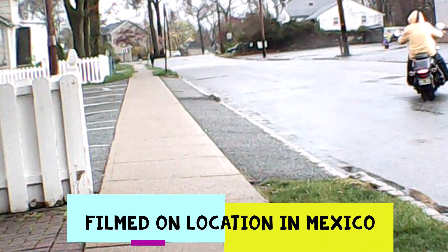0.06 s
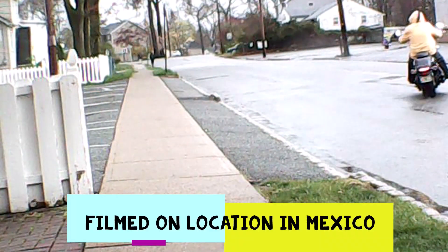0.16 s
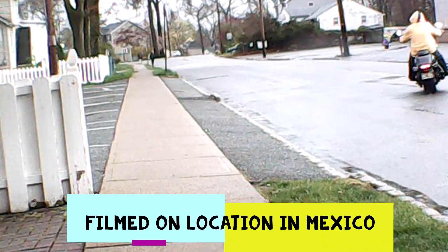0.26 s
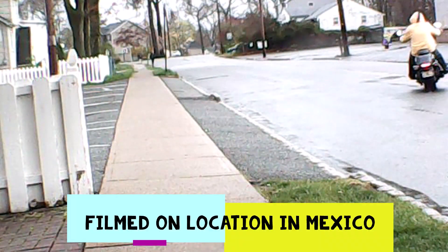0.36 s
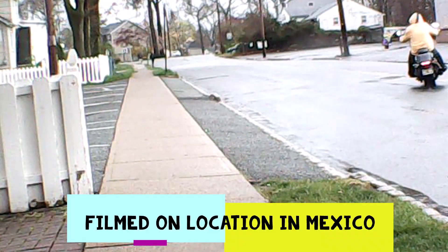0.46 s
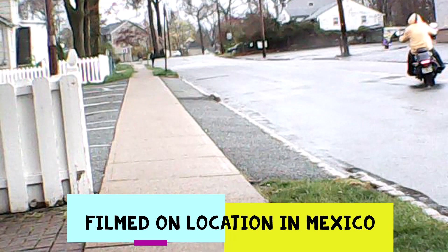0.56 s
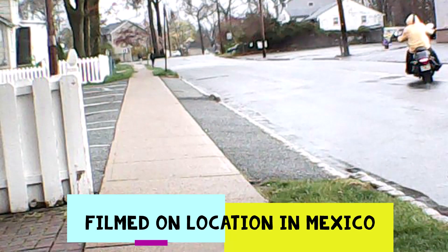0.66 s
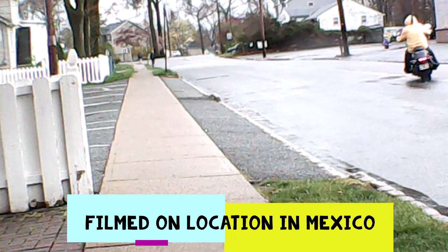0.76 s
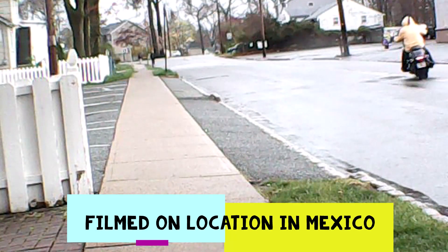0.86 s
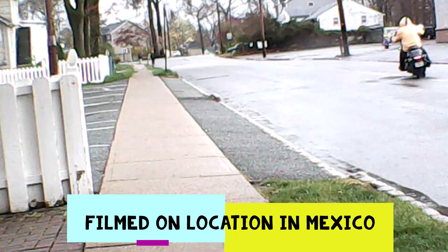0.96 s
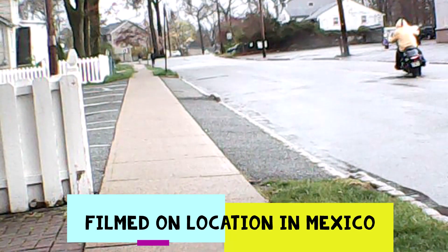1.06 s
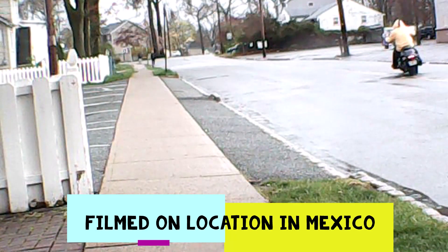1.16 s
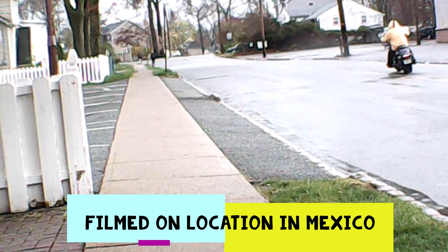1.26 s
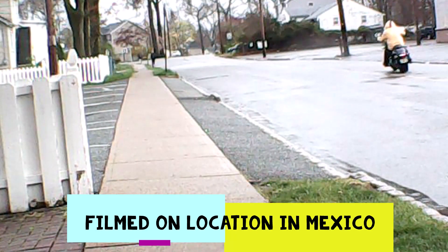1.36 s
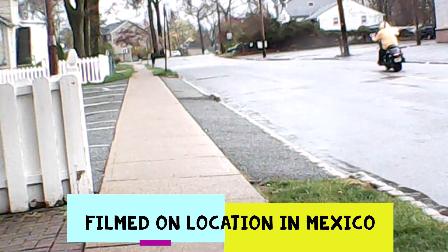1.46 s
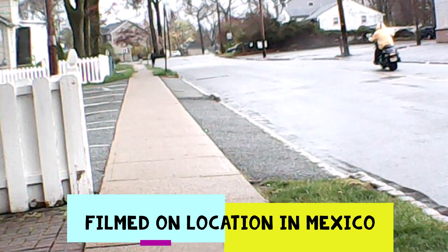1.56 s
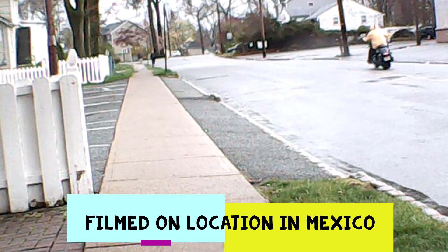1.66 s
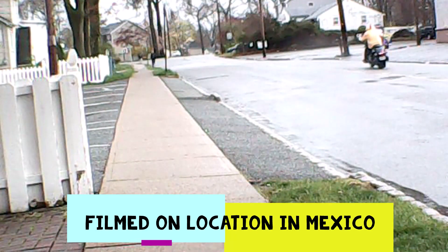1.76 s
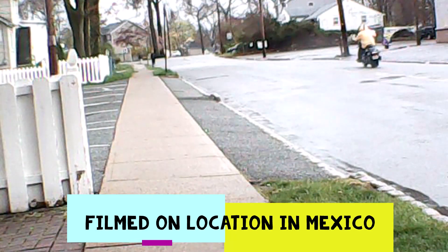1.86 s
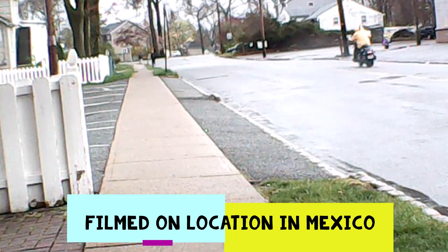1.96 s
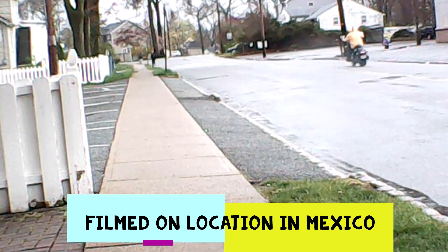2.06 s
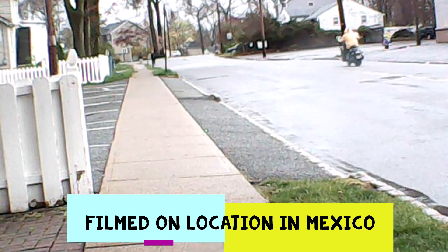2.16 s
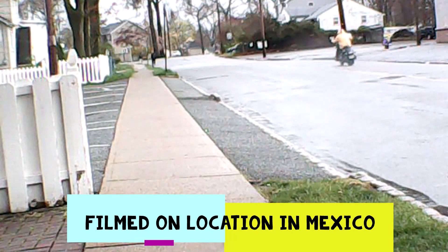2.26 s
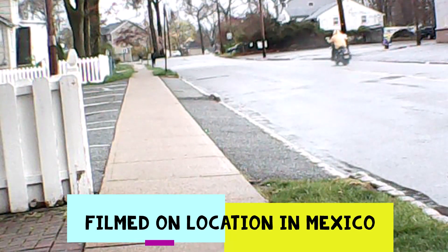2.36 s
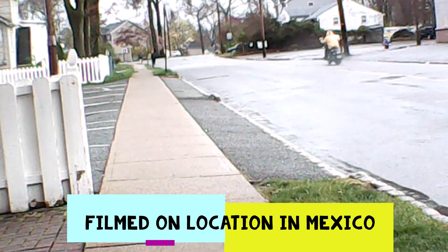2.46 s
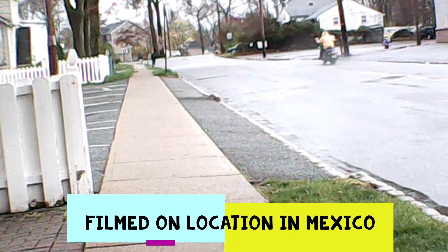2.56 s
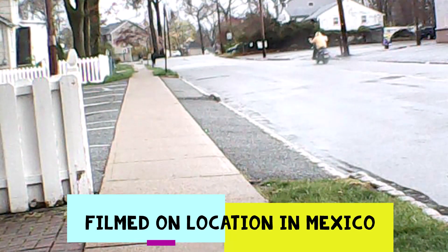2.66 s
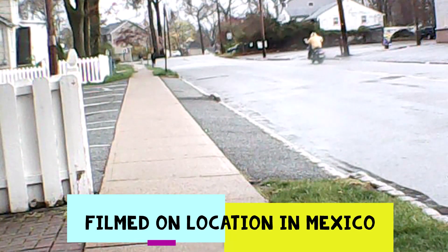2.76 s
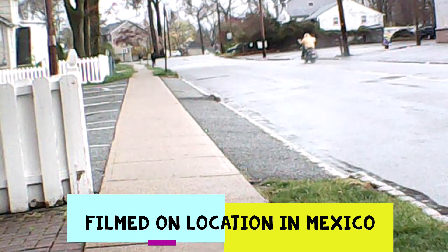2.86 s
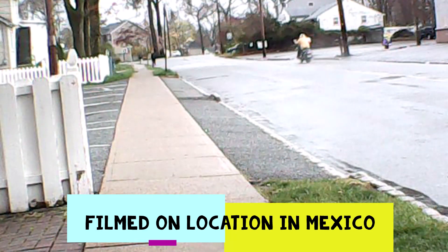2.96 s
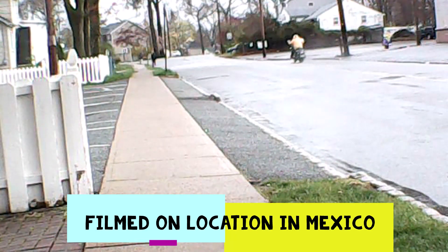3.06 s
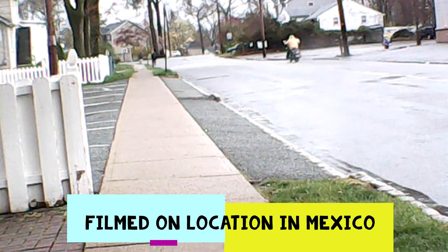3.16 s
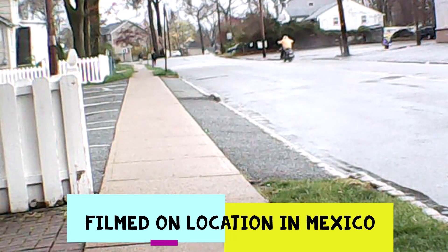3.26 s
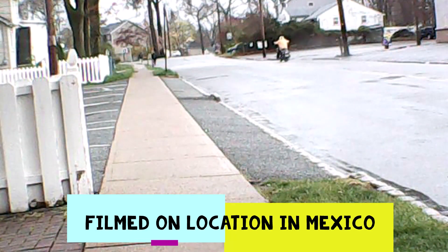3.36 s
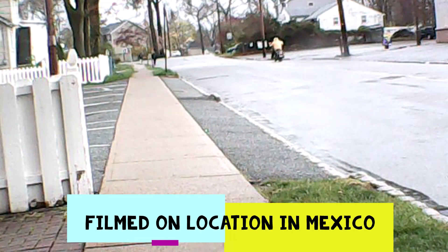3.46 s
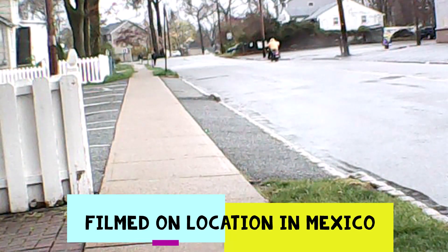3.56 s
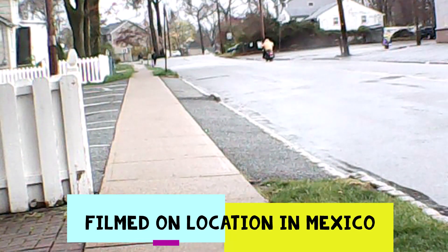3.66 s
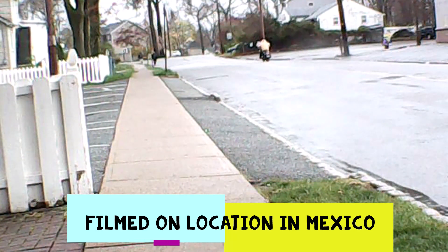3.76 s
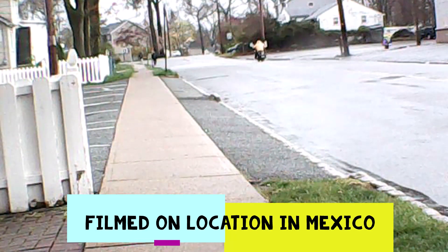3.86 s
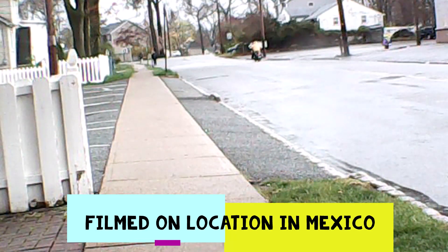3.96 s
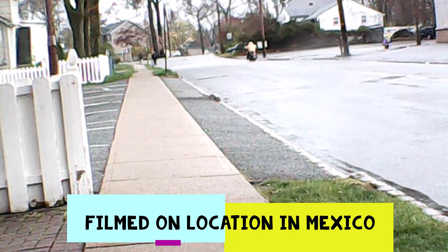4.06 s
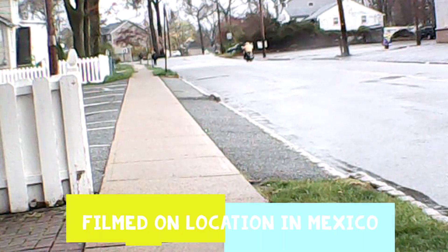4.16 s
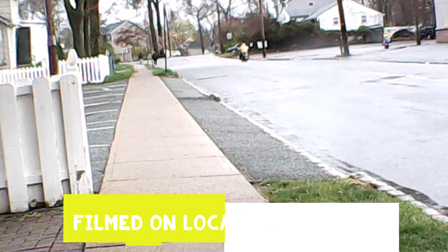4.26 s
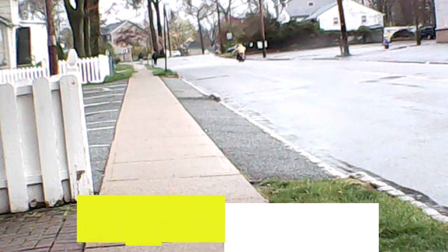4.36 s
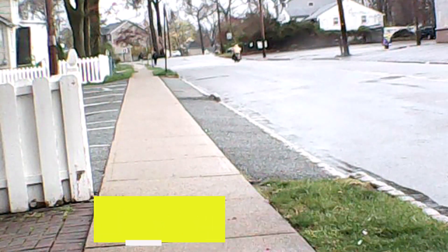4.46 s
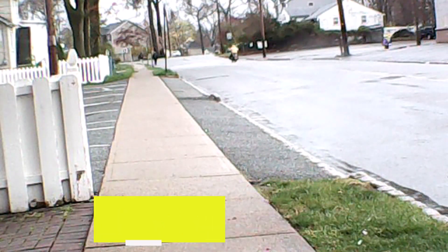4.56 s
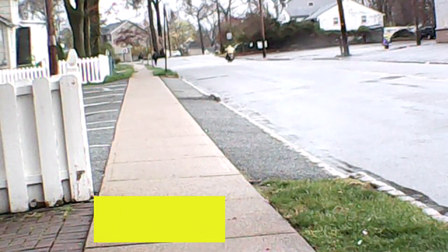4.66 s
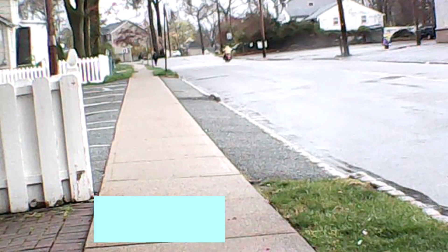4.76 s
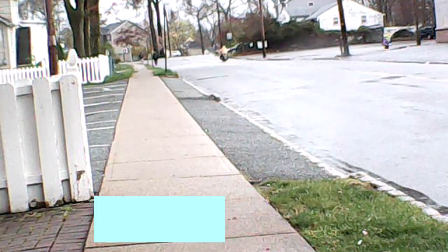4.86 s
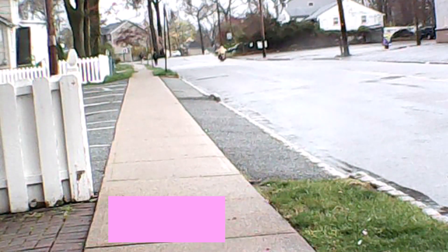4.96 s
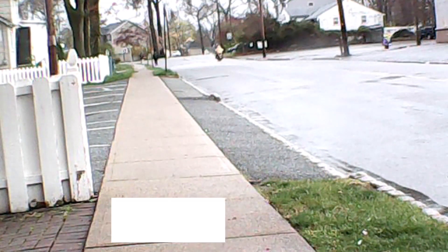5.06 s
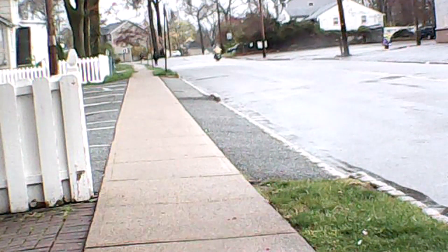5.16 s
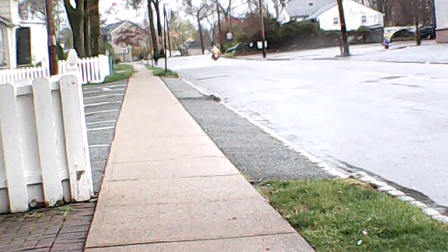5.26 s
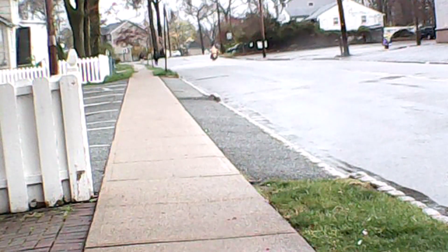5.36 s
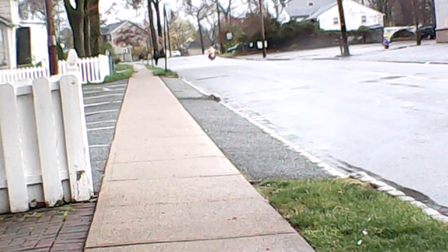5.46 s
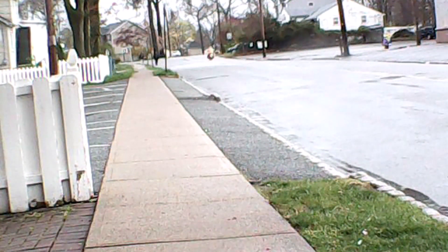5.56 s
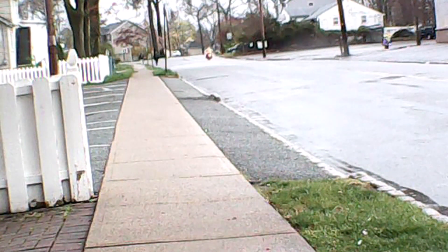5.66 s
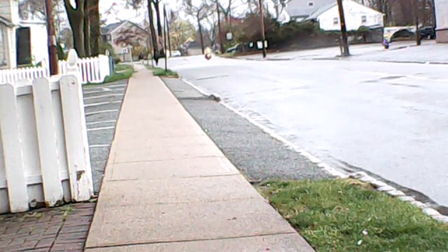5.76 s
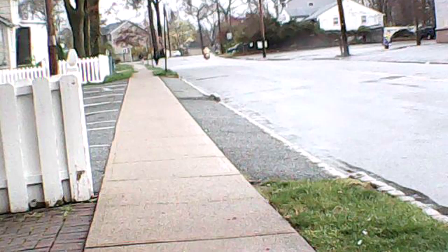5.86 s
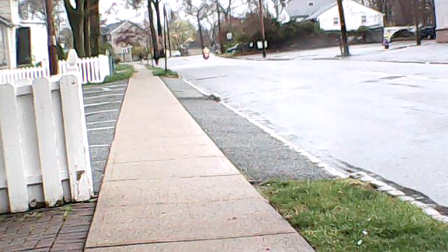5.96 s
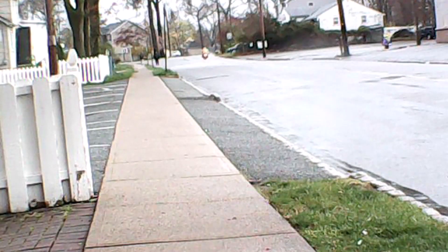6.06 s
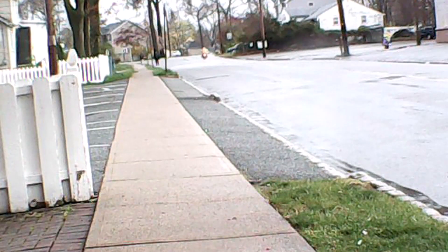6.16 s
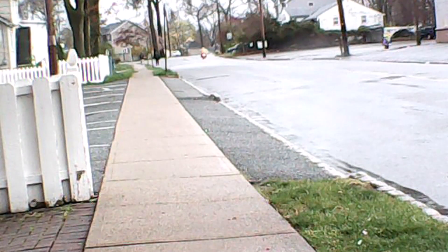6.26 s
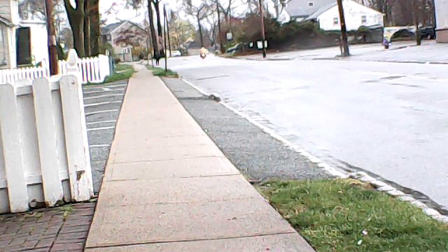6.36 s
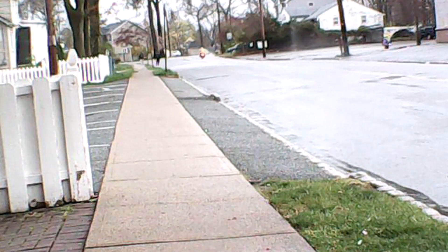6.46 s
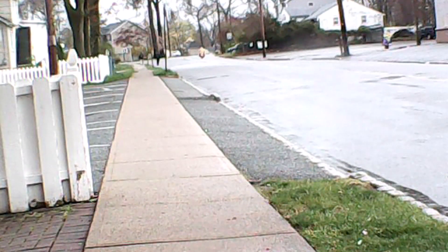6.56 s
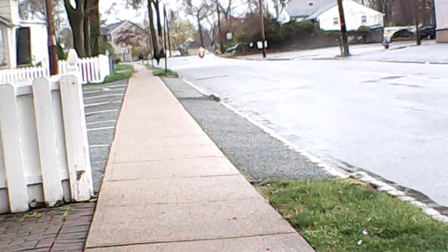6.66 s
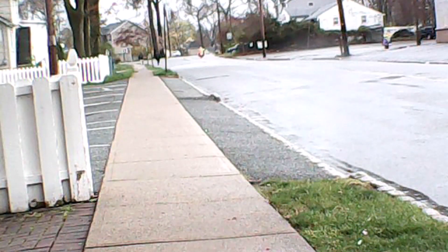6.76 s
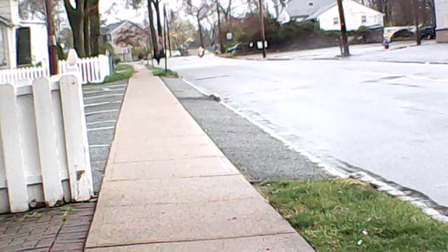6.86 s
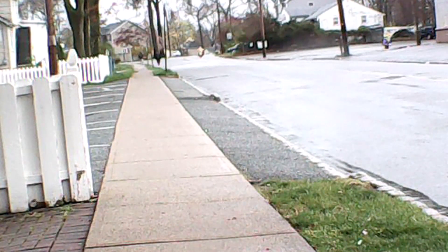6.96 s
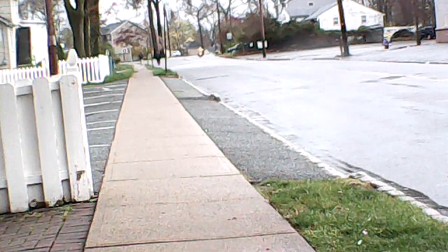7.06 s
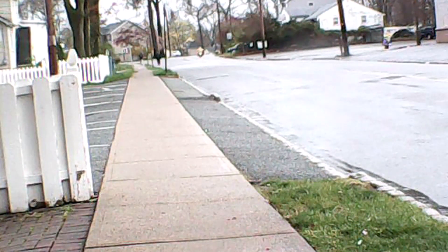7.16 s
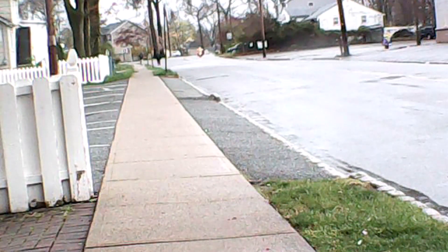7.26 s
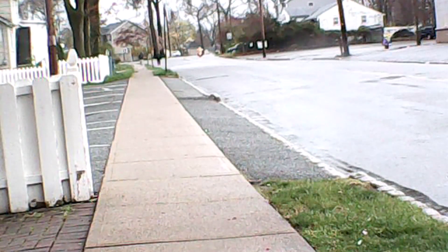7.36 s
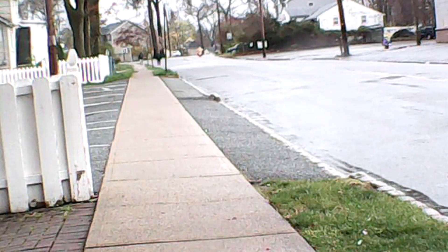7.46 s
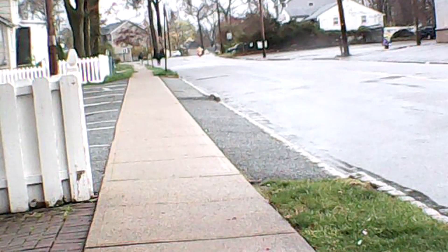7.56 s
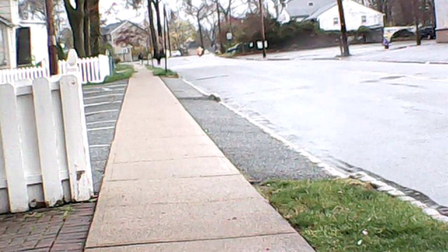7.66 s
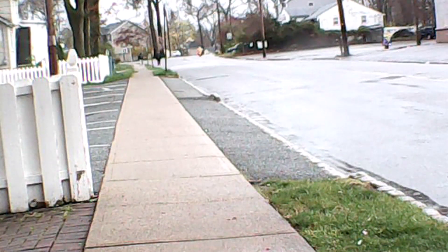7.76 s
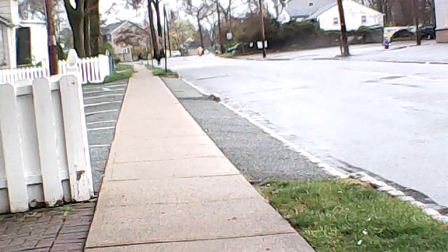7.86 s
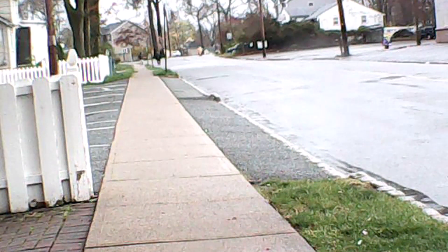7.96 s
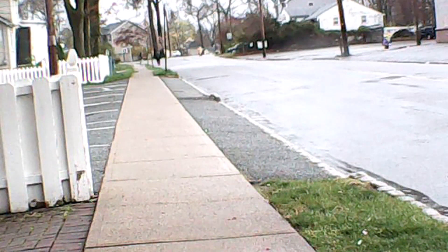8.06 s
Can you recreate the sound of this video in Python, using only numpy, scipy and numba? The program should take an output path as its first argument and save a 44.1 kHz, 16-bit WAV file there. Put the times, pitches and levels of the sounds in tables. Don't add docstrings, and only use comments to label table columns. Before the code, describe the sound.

Open-piped twin-cylinder motorcycle pulls away, its uneven bark climbing, dropping at two gear shifts, then slowing on the overrun with one sharp backfire.

```python
import sys
import numpy as np
from scipy import signal
from scipy.fft import rfft, irfft
from scipy.io import wavfile
from scipy.ndimage import uniform_filter1d
from numba import njit

SR = 44100
rng = np.random.default_rng(int(sys.argv[2]) if len(sys.argv) > 2 else 0)


def generate_wav(signal):
    frames = np.transpose(np.atleast_2d(signal))
    scaled = np.clip(frames, -1, 1) * 32767
    pcm = np.round(scaled).astype(np.int16)
    wavfile.write(sys.argv[1], SR, pcm)


def voltage_ratio(decibels):
    exponent = np.asarray(decibels, float) / 20
    return 10 ** exponent


N = 357651
TIME = np.arange(N) / SR


def curves(table):
    start_s, *columns = np.transpose(table)
    return [np.interp(TIME, start_s, column) for column in columns]


def unit(x, smooth_s=0.18):
    k = int(smooth_s * SR)
    power = uniform_filter1d(uniform_filter1d(x ** 2, k), k)
    return x / np.sqrt(power + 1e-18)


def steep(x, kind, hz, order=3):
    return signal.sosfiltfilt(signal.butter(order, hz, kind, fs=SR, output="sos"), x)


def ring(x, modes):
    out = 0
    for hz, width, db in modes:
        out = out + voltage_ratio(db) * signal.lfilter(*signal.iirpeak(hz, hz / width, fs=SR), x)
    return out


def add(out, at, shapes, first=0):
    where = at[:, None] + first + np.arange(shapes.shape[1])
    inside = (where >= 0) & (where < N)
    np.add.at(out, where[inside], shapes[inside])


# start_s [s], cycle_rate_hz [four-stroke cycles a second]
ENGINE_SPEED = [(0.0, 13.29), (0.25, 14.54), (0.5, 16.04), (0.75, 17.31), (1.0, 18.76), (1.25, 20.08),
                (1.5, 21.59), (1.8, 23.63), (2.1, 25.8), (2.4, 28.51), (2.7, 32.06), (2.95, 35.26),
                (3.15, 37.47), (3.3, 39.27), (3.45, 40.34), (3.52, 39.43), (3.6, 36.02), (3.7, 27.08),
                (3.85, 27.17), (4.05, 28.56), (4.3, 30.17), (4.55, 31.58), (4.75, 32.76), (4.94, 32.71),
                (5.05, 30.26), (5.25, 33.09), (5.45, 30.76), (5.65, 30.98), (5.9, 29.83), (6.2, 28.68),
                (6.5, 27.14), (6.8, 25.62), (7.1, 24.04), (7.5, 22.09), (7.85, 20.39), (8.11, 19.06)]


def firings():
    start_cycle, rear_share, rear_lead_s = -.322, 300 / 720, .0011
    cycle = start_cycle + np.cumsum(curves(ENGINE_SPEED)[0]) / SR
    whole = np.arange(int(cycle[-1]))
    front = np.interp(whole, cycle, TIME)
    rear = np.interp(whole + rear_share, cycle, TIME) - rear_lead_s
    return front, rear


# start_s [s], depth_before [0-1], depth_after [0-1]
SUCTION = [(0, 0.45, 1), (1.2, 0.53, 0.31), (2.3, 0.47, 0.06), (3.4, 0.26, 0.29), (4.5, 0.4, 0.4),
           (5.5, 0.3, 0.63), (8.11, 0.44, 0.19)]
# pitch_hz [Hz], width_hz [Hz], level_db [dB]
PIPE_MODES = [(93, 42, -8.5), (200, 20, -19.5), (330, 210, -13.5), (531, 122, -7)]
# start_s [s], upper_share of the bark [0-1], burst_ms [ms], return_db from the farthest front [dB]
GAS_CRACK = [(0, 0.41, 1.3, -21), (1.5, 0.39, 1.0, -13.5), (2.6, 0.41, 0.89, -5.5), (3.5, 0.29, 1.2, -7),
             (3.8, 0.77, 1.1, 6.5), (4.6, 0.92, 0.59, 6.5), (5.0, 0.47, 2, -23), (6.3, 0.3, 2.0, -5),
             (6.6, 0.13, 2.5, 5), (8.11, 0.38, 2.3, 3)]


def exhaust(width_ms, rear_db, scatter_db=0.8, dip_ms=0.76, before_ms=1.1, after_ms=2.275):
    front, rear = firings()
    when = np.r_[front, rear]
    at = (when * SR).astype(int)
    size_chance, width_chance, gas_chance = rng.standard_normal((3, len(at)))
    cylinder_db = np.r_[0 * front, rear_db[at[len(front):]]]
    size = voltage_ratio(scatter_db * size_chance + cylinder_db)[:, None]
    ms = 1000 * ((at[:, None] + np.arange(-256, 768)) / SR - when[:, None])

    width = (width_ms[at] * (1 + 0.11 * width_chance))[:, None]
    before, after = (depth[at][:, None] for depth in curves(SUCTION))
    shape = np.exp(-.5 * (ms / width) ** 2)
    shape -= before * np.exp(-.5 * ((ms + before_ms) / dip_ms) ** 2)
    shape -= after * np.exp(-.5 * ((ms - after_ms) / dip_ms) ** 2)
    pulses = np.zeros(N)
    add(pulses, at, size * shape, first=-256)
    boom = pulses + ring(pulses, PIPE_MODES)

    beats = np.zeros(N)
    add(beats, at, np.ones((len(at), 1)))
    thump = steep(steep(beats, "low", 120.0), "high", 56.0)

    upper, burst_ms, _ = curves(GAS_CRACK)
    late = np.maximum(ms + 1.284, 0) / burst_ms[at][:, None]
    burst = late * (np.exp(-1.6 * late) + 0.037 * np.exp(-.4 * late))
    gate = np.zeros(N)
    add(gate, at, voltage_ratio(3.5 * gas_chance)[:, None] * burst, first=-256)
    return boom, thump, bark(gate * rng.standard_normal(N), upper)


# pitch_hz [Hz], width_hz [Hz], level_db [dB]
LOW_BARK = [(903, 423, 5.5), (1297, 530, 0.5)]
HIGH_BARK = [(1654, 360, 2), (2072, 385, -7.5), (3570, 400, -18)]


def bark(noise, upper):
    low = ring(ring(noise, LOW_BARK), LOW_BARK)
    high = ring(ring(noise, HIGH_BARK), HIGH_BARK)
    return (1 - upper) * low + upper * high


# start_s [s], peak_db [dB], pitch_hz [Hz], crack_db [dB], t60_s [s]
BACKFIRES = [
    (5.268, -22, 322, -10, 0.042),
    (6.387, -20, 333, -12, 0.053),
    (7.4009, -4.5, 330, -3, 0.051),
    (7.425, -15.5, 342, -29, 0.052),
    (7.45, -31, 335, 3, 0.03),
    (7.727, -26, 330, -16, 0.083),
]


def backfires():
    out, t = np.zeros(N), np.arange(4096) / SR
    for s, db, hz, crack_db, t60 in BACKFIRES:
        fall = np.exp(-np.log(1000) * t / t60) * (1 - np.exp(-t / 0.00019))
        overtone = 0.56 * np.sin(2 * np.pi * 2.655 * hz * t) * fall
        blast = -np.sin(2 * np.pi * hz * t) - overtone
        crack = bark(rng.standard_normal(len(t)), 0.6) * voltage_ratio(crack_db - 6.0)
        pop = voltage_ratio(db) * fall * (blast + crack)
        add(out, np.array([int(s * SR)]), pop[None])
    return steep(out, "low", 3900.)


def echo(x, table):
    ms, db = curves(table)
    return voltage_ratio(db) * np.interp(TIME - ms / 1000, TIME, x, left=0)


# start_s [s], delay_ms [ms], level_db [dB]
FENCE = [(0, 9.85, -11.5), (1.4, 9.6, -15.5), (2.0, 8.36, -16), (3.5, 11.2, -28), (3.8, 9.44, -11),
         (4.9, 9.16, -9), (5.4, 14, -20.5), (8.11, 15.2, -10.5)]
KERB = [(0, 4.6, -24.5), (1.002, 5, -17), (2.4, 7.5, -23.5), (3.5, 7, -19), (3.8, 6, -14.5),
        (4.9, 6, -12.5), (5.05, 5.7, -9), (5.5, 5.5, -6.5), (6.3, 6, -6.5), (6.8, 6.4, -4.5), (7.3, 6, 9.5),
        (8.11, 6, 4.5)]
PORCH = [(0, 14.6, -20.5), (1.498, 13.2, -18), (2.601, 14.5, -25), (2.801, 14, -15.5), (3.452, 11.7, -7.5),
         (3.798, 21, -9.5), (4.602, 14, -10.5), (5.0, 12.2, -9), (6.3, 12, -11), (8.11, 13, -8.5)]


def reflections(boom, crack):
    boom = boom + echo(boom, FENCE) + echo(boom, KERB) + echo(boom, PORCH)
    return_db = curves(GAS_CRACK)[2] + 15.5
    crack = crack + echo(crack, KERB) + voltage_ratio(return_db) * echo(crack, PORCH)
    return steep(boom, "high", 105.), crack


@njit
def street(x, lags, gain, damp):
    line, soft, out = np.zeros((8, 4096)), np.zeros(8), np.zeros(len(x))
    for i in range(len(x)):
        total = 0.
        for k in range(8):
            soft[k] += (1 - damp) * (gain[k] * line[k, (i - lags[k]) & 4095] - soft[k])
            total += soft[k]
        out[i] = soft[0] - soft[3] + soft[5] - soft[6]
        for k in range(8):
            line[k, i & 4095] = x[i] + soft[k] - total / 4
    return out


def street_wash(x, t60_s=0.68, damp=0.5):
    lags = rng.integers(700, 2800, size=8)
    return street(x, lags, voltage_ratio(-60 * lags / SR / t60_s), damp)


# start_s [s], peak_db [dB], pitch_hz [Hz]
DRIP = [
    (6.4762, -34, 4640),
]


def drip():
    (s, db, hz), t = DRIP[0], np.arange(512) / SR
    splash = ring(rng.standard_normal(len(t)), [(hz, 2400, 12.)])
    splash = splash * t / 0.0008 * np.exp(-t / 0.0009)
    out = np.zeros(N)
    add(out, np.array([int(s * SR)]), voltage_ratio(db) * splash[None])
    return out


def coloured(points):
    hz, db = np.transpose(points)
    bins = np.arange(1, N // 2 + 2) * SR / N
    colour = voltage_ratio(np.interp(np.log(bins), np.log(hz), db))
    x = irfft(rfft(rng.standard_normal(N)) * colour, N)
    return x / x.std()


def walk(rate):
    k = int(SR / rate)
    held = np.repeat(rng.standard_normal(N // k + 1), k)
    return 1.9 * uniform_filter1d(uniform_filter1d(held, k), k)[:N]


# pitch_hz [Hz], level_db [dB per Hz]
TYRE_HISS = [(400, -18), (1000, 11.5), (1600, 3), (2200, -10), (3100, -12), (3800, -10), (4800, -20),
             (6800, -25.5), (9000, -38)]


def tyre_hiss(hiss_db):
    return coloured(TYRE_HISS) * voltage_ratio(hiss_db + 15.0 + 1.2 * walk(12))


# pitch_hz [Hz], level_db [dB per Hz]
TOWN_RUMBLE = [(15, -55), (50, -18.5), (120, -3), (300, -8), (600, -2), (1400, -19), (3000, -45.5)]


def town_rumble(level_db=-47):
    return coloured(TOWN_RUMBLE) * voltage_ratio(level_db + 1.5 * walk(2.766))


# start_s [s], exhaust_db [dB], thump_db [dB], crack_db [dB], hiss_db [dB],
# pulse_width_ms [ms], street_db [dB], rear_cylinder_db [dB]
RIDE = [(0.0, -21.5, -29, -33, -55.5, 0.46, -8, 2), (0.22, -21.5, -30, -34.5, -58.5, 0.39, -5, 0),
        (0.44, -22.5, -31.5, -34.5, -58, 0.49, -5.5, -1.5), (0.66, -22, -34, -38, -57.5, 0.51, -5, -2),
        (0.88, -23, -32, -38, -56.5, 0.41, -6.5, 4), (1.1, -19.5, -40, -38.5, -56.5, 0.45, -8.5, 0),
        (1.32, -23.5, -29, -36.5, -57.5, 0.41, -8.5, 5), (1.54, -20.5, -28, -33, -53, 0.34, -6, -1),
        (1.76, -21.5, -32.5, -31.5, -50.5, 0.41, -4.5, 2), (1.98, -20, -39, -33.5, -53.5, 0.34, -10.5, 0),
        (2.2, -19.5, -41, -35, -55.5, 0.41, -9, 0.5), (2.42, -19.5, -41, -36.5, -54.5, 0.36, -9.5, -5.5),
        (2.64, -19, -41, -33, -50.5, 0.39, -10, 1.5), (2.86, -21, -44, -30.5, -48.5, 0.34, -9, 2.5),
        (3.08, -21.5, -43, -29.5, -52.5, 0.34, -7, -0.5), (3.3, -22.5, -44.5, -31, -54.5, 0.19, -6, 2.5),
        (3.42, -28, -58, -34.5, -53.5, 0.27, -8.5, 5), (3.48, -33.5, -57, -40.5, -62, 0.32, -4.5, -5),
        (3.58, -34, -60, -46.5, -62.5, 0.44, -10.5, -7), (3.68, -35, -51, -52, -66.5, 0.43, -4.5, -4.5),
        (3.73, -30.5, -54, -42, -60.5, 0.35, -6, 2), (3.85, -27.5, -54, -39, -53, 0.33, -10, 0.5),
        (4.0, -31, -49, -46, -58.5, 0.23, -2.5, -4), (4.15, -28.5, -58.5, -48.5, -57.5, 0.23, -6.5, -0.5),
        (4.3, -28.5, -54, -38, -57.5, 0.27, -9, 0.5), (4.45, -28, -46, -36, -56.5, 0.17, -11, 2.5),
        (4.6, -27, -50, -40.5, -61, 0.24, -6, -1.5), (4.75, -27.5, -56, -42, -59.5, 0.22, -11, 2.5),
        (4.9, -28.5, -57, -43.5, -61, 0.34, -3, 6.5), (4.96, -41.5, -56, -50.5, -65.5, 0.39, 8.5, -9.5),
        (5.03, -35.5, -49, -48, -65, 0.4, -10.5, 4), (5.12, -33, -60, -49, -64, 0.6, -4.5, -13),
        (5.24, -31, -51, -49, -71, 0.59, -7, 4), (5.3, -35.5, -58, -49, -68, 0.4, 6, 12),
        (5.36, -33.5, -43, -47.5, -67, 0.44, -12, 0.5), (5.5, -30, -40.5, -47, -66.5, 0.38, -9.5, 1),
        (5.7, -30.5, -44, -49, -67, 0.32, -5, -1), (5.9, -31, -43.5, -49, -68, 0.39, -6, 4.5),
        (6.1, -32.5, -48, -52, -69, 0.45, -6.5, 1), (6.25, -37.5, -42, -51.5, -70.5, 0.29, 0.5, 7),
        (6.36, -41, -50, -50.5, -77, 0.32, 6, 10), (6.4, -27, -42, -45, -65, 0.31, -5, -3),
        (6.55, -31.5, -38.5, -42.5, -69, 0.3, -6.5, 7), (6.7, -35.5, -38.5, -44, -67, 0.28, 1, -6),
        (6.85, -32.5, -36.5, -40.5, -64.5, 0.34, -12, 2), (7.0, -36.5, -38.5, -39, -61.5, 0.34, -13, -1),
        (7.15, -34.5, -35, -40, -65, 0.37, -1, 10), (7.3, -33, -41, -39, -60.5, 0.4, -30, -4),
        (7.38, -28.5, -48, -37.5, -64, 0.32, -21, -1), (7.5, -33.5, -41, -36.5, -63.5, 0.37, -4, 10),
        (7.6, -34, -39, -46, -60.5, 0.4, -1, 8), (7.7, -40, -45, -41, -65, 0.43, 1.5, 8),
        (7.75, -26.5, -37, -36, -60.5, 0.39, -12, 2), (7.9, -32.5, -35.5, -42, -58.5, 0.38, 3.5, -2.5),
        (8.0, -39, -31, -38.5, -58.5, 0.27, -3, 10), (8.11, -36, -33, -40.5, -58, 0.27, 5, 6)]


def scene():
    boom_db, thump_db, crack_db, hiss_db, width_ms, street_db, rear_db = curves(RIDE)
    boom, thump, crack = exhaust(width_ms, np.clip(rear_db, -2.5, 7))
    boom, crack = reflections(boom, crack)
    bike = unit(boom) * voltage_ratio(boom_db) + unit(crack) * voltage_ratio(crack_db - 2.0)
    surge = unit(thump) * voltage_ratio(thump_db)
    pops = backfires()
    wash = voltage_ratio(-4.0) * street_wash(bike * voltage_ratio(street_db) + pops * voltage_ratio(-14.5))
    mix = bike + surge + pops + wash + drip() + tyre_hiss(hiss_db) + town_rumble()
    return mix[None]


TREBLE_GAPS = [.227, 0.734, .798, 1.2, 1.505, 2.738, 3.344, 3.378, 3.484, 6.173, 6.857, 6.984, 7.580, 7.964,
               8.07]


def treble_losses(x):
    dull = steep(x, "low", 2600., order=8)
    lost = sum(np.exp(-((TIME - s) / 0.011) ** 4) for s in TREBLE_GAPS)
    return x + np.clip(lost, 0, 1) * 0.77 * (dull - x)


def roll_off(x):
    return signal.sosfilt(signal.butter(12, 7180, fs=SR, output="sos"), x)


def record(dry):
    x = treble_losses(steep(dry, "high", 52.0))
    top_hz = 7000
    x = signal.sosfiltfilt(signal.cheby2(10, 40, 1.112 * top_hz, fs=SR, output="sos"), x)
    mix = x + voltage_ratio(-89.0) * rng.standard_normal(x.shape)
    return roll_off(mix)


dry = scene()
out = record(dry)
generate_wav(out)
```